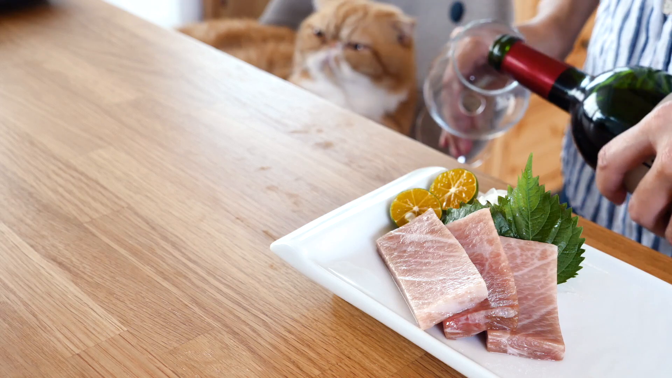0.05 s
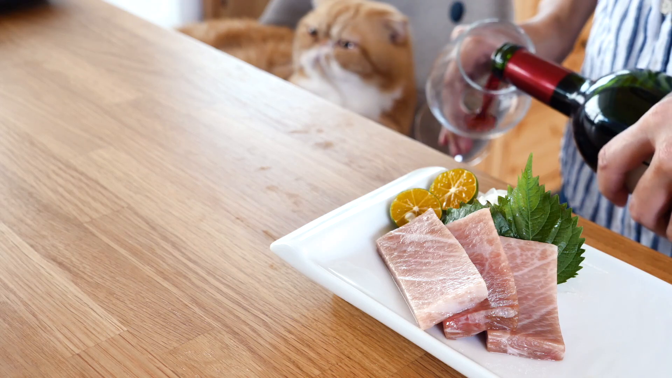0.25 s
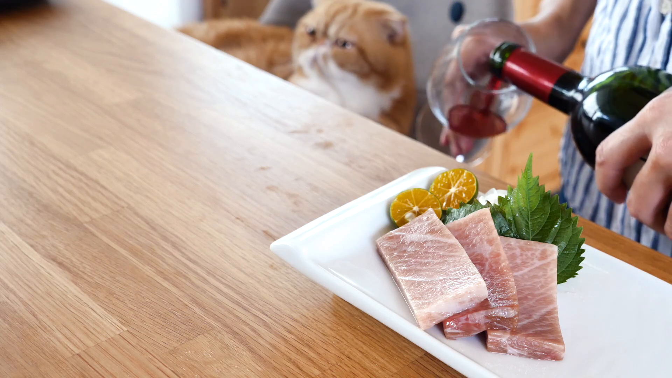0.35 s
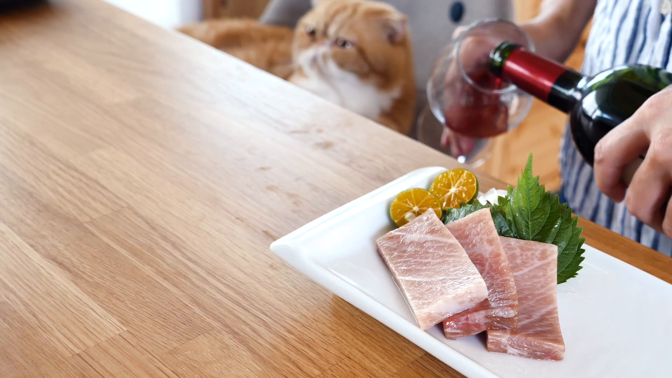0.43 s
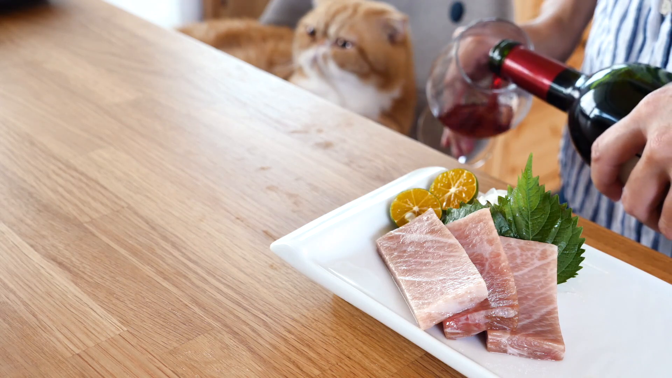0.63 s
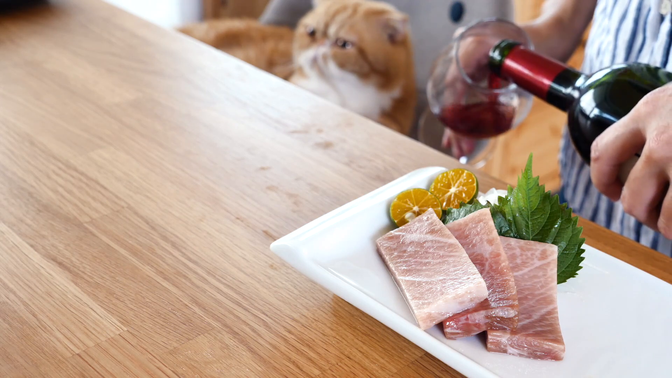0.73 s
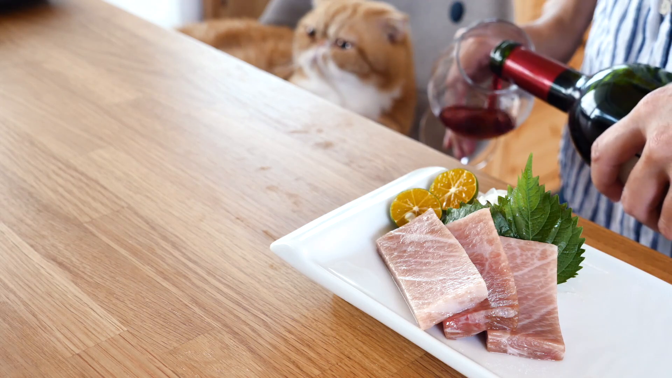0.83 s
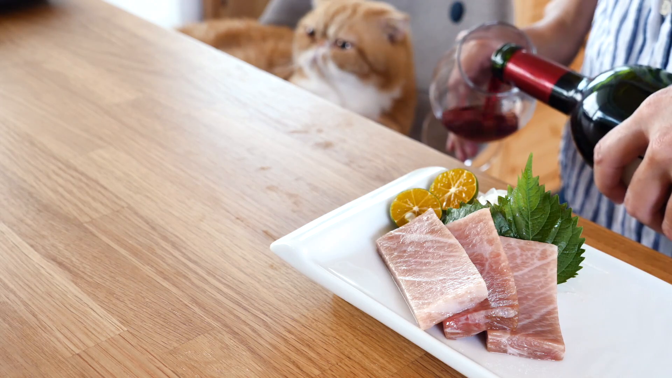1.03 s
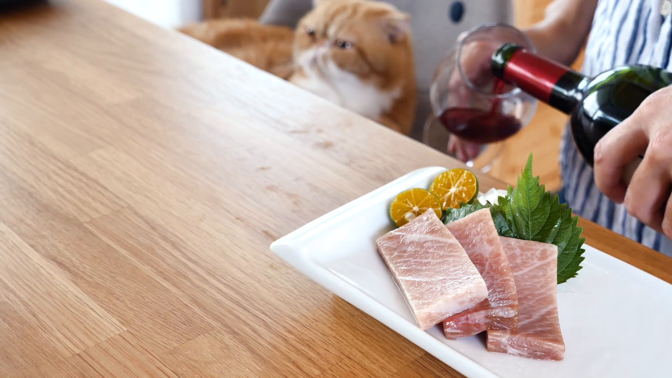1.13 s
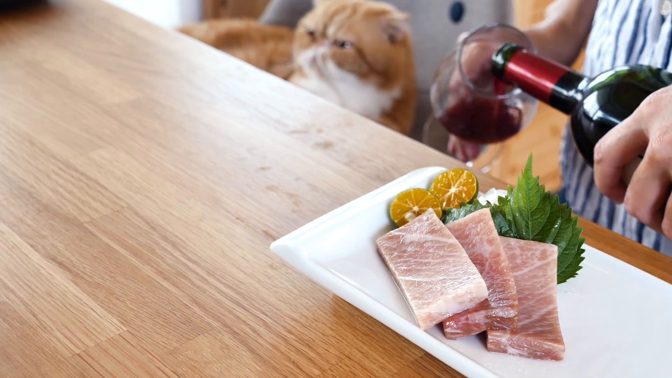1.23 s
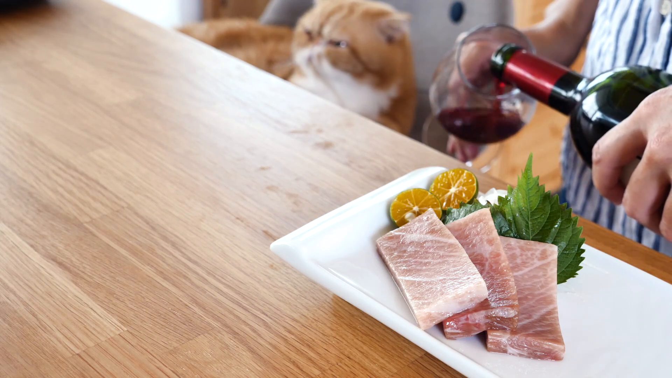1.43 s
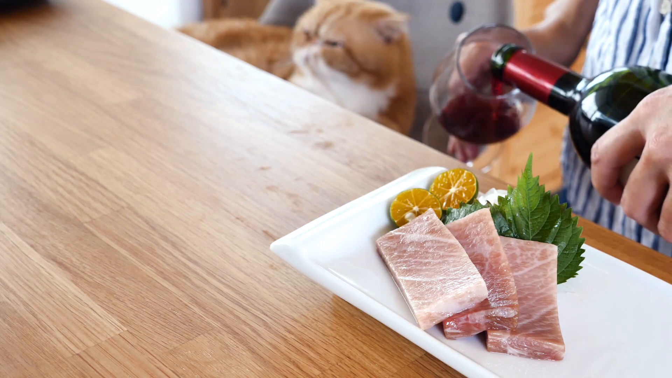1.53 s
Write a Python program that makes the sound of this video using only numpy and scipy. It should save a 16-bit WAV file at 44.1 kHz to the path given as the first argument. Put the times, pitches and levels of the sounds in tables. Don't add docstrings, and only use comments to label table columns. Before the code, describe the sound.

A full wine bottle's neck knocks the rim of a stemmed glass; the bright ring beats and fades, then a faint tick and sparse tiny bubbles follow, close to one microphone in a quiet room with ventilation hum.

```python
import sys
import numpy as np
from scipy import signal
from scipy.fft import rfft, irfft
from scipy.io import wavfile

SR = 44100
rng = np.random.default_rng(int(sys.argv[2]) if len(sys.argv) > 2 else 0)


def amplitude_ratio(level_db):
    exponent = np.asarray(level_db, float) / 20
    return 10 ** exponent


def dump_mix(stems):
    frames = np.atleast_2d(stems).T
    limited = np.clip(frames, -1, 1)
    pcm = np.round(limited * 32767).astype(np.int16)
    wavfile.write(sys.argv[1], SR, pcm)


N = 68355

CLINK_S, CONTACT_S = .2173, .0003
HIGH_LAG_S, HIGH_FROM_HZ = .0026, 5200
CRACK_DB, CRACK_T60_S = -18, .05
AFTERGLOW_DB, AFTERGLOW_T60_S = -34, .5
# frequency in Hz, level in dB, t60 in seconds.
BOWL_MODES = [(1210.9, -23.9, .48), (2619.2, -22, .34), (3255, -22, .06), (5445.5, -38, .5),
              (7376.2, -29, .12), (8279, -35, .2), (9690, -27, .08), (12812, -47, .12), (14698, -45, .1),
              (7762, -38, .08), (11015, -50, .1), (14000, -47, .07), (15250, -52, .05)]
# offset in Hz,
# share of the level (negative = opposed), t60 in seconds.
BOWL_TWINS = [(4, -.64, .64), (-11.3, -.45, .55), (-40, .03, .3), (6, .95, .5), (17, -.16, .6), (9, .3, .4),
              (-8, .12, .35), (-30, .3, .3), (29, -.1, .29), (5.2, -.1, .44), (6, .2, .3), (60, .5, .1),
              (90, .5, .1)]
# frequency in Hz, level in dB, t60 in seconds.
BOTTLE_MODES = [(559, -23, .14), (2030, -14, .02), (1825, -40, .15), (3441, -28, .17), (3500, -24, .06),
                (3820, -23, .1), (3655, -32, .1), (4772, -29, .12), (5032, -44, .2), (6080, -46, .1),
                (7194, -35, .12), (9810, -36, .08), (10450, -48, .15), (13280, -46, .08)]
# frequency in Hz, level in dB, t60 in seconds, sign.
SPLIT_CLUSTERS = [
    [(3180.6, -19.4, .85, -1), (3185.4, -20.4, .68, 1), (3189.2, -32, 1.05, -1), (3232.5, -30.8, .28, 1),
     (3170.4, -33.9, .75, -1), (3200, -31, .75, -1)],
    [(2457.8, -16.1, .21, -1), (2448.6, -28.4, .6, 1), (2472.3, -28.4, .55, 1)],
]
# frequency in Hz, level in dB per Hz.
CRACK_COLOUR = [(400, -26), (1500, -8), (2200, -2), (2850, -16), (3500, 0), (5000, -12), (6500, -32),
                (8500, -24), (15500, -38)]
# frequency in Hz, level in dB per Hz.
AFTERGLOW_COLOUR = [(1300, -14), (2100, -2), (2900, -22), (3500, 0), (5000, -8), (6300, -30), (8000, -28),
                    (15500, -42)]

TICK_S, TICK_DB, TICK_T60_S = .7522, -30, .02
TICK_TAIL_DB, TICK_TAIL_T60_S = -47, .12
# frequency in Hz, level in dB per Hz.
TICK_COLOUR = [(1800, -26), (3000, -14), (4000, -5), (5000, -9), (7000, -10), (10700, -20), (14400, -21),
               (16200, -24)]
# frequency in Hz, level in dB, t60 in seconds.
TICK_MODES = [(3990, -34, .05), (2200, -39, .02), (4538, -42, .16), (5001, -42, .08), (5663, -43, .1),
              (6697, -40, .03), (7251, -52, .1), (7612, -54, .15), (8215, -50, .05), (8839, -52, .06),
              (6115, -47, .15)]

# start in seconds, frequency in Hz, level in dB, t60 in seconds.
BUBBLES = [(.691, 1640, -34, .09), (.692, 540, -36, .07), (1.408, 5900, -53, .02), (1.449, 5850, -50, .04),
           (1.462, 12400, -63, .02), (1.462, 15600, -65, .03), (1.531, 6300, -55, .03),
           (1.342, 11500, -54, .012), (1.344, 10200, -57, .018), (1.201, 8800, -60, .02),
           (1.16, 9800, -61, .012)]
# start in seconds, level in dB, t60 in seconds.
FIZZ_PUFFS = [
    (1.192, -57, .012),
    (1.199, -61, .06),
    (1.342, -61, .04),
]
FIZZ_BAND_HZ = [8000, 15200]

ROOM_DB, ROOM_T60_S, ROOM_FROM_HZ = -10, .42, 3400

RUMBLE_DB, WHOOSH_DB, HISS_DB = -38.5, -43, -65
# frequency in Hz, level in dB per Hz.
RUMBLE_COLOUR = [(20, -47), (50, -12), (120, -8.5), (162, -.5), (244, -3), (303, -2.5), (541, -12.5),
                 (800, -15.5)]
# frequency in Hz, level in dB per Hz.
WHOOSH_COLOUR = [(470, -38), (800, -5), (987, -2.5), (1150, -2.5), (1360, -3.5), (1460, -3.5), (2880, -14),
                 (3800, -11.5), (5500, -29.5), (7150, -49), (12100, -120)]
# frequency in Hz, level in dB per Hz.
HISS_COLOUR = [(3240, -40), (5500, -2), (6500, -4.5), (8780, -10), (15000, -14.5), (15800, -11),
               (15900, -45)]
# time in seconds, level in dB.
DRAUGHT = [(0, -0.76), (.4, -0.2), (.7, -0.46), (1.1, -0.43), (1.55, -1)]

CUTOFF_HZ = 16000


def rms_one(x):
    return x / np.sqrt(np.mean(x ** 2) + 1e-20)


def coloured(spectrum):
    hz, db = np.transpose(spectrum)
    bins_hz = np.maximum(np.arange(N // 2 + 1) * SR / N, 1)
    gain = amplitude_ratio(np.interp(np.log(bins_hz), np.log(hz), db, left=-90, right=-90))
    return rms_one(irfft(gain * rfft(rng.standard_normal(N)), N))


def dying(start, t60):
    age = np.maximum(np.arange(N) / SR - start, 0)
    rise = 1 - np.exp(-age / CONTACT_S)
    return rise * amplitude_ratio(-60 * age / t60)


def ring(start, hz, db, t60, phase=0):
    age = np.arange(N) / SR - start
    return amplitude_ratio(db) * dying(start, t60) * np.sin(2 * np.pi * hz * age + phase)


def clink():
    out = coloured(CRACK_COLOUR) * amplitude_ratio(CRACK_DB) * dying(CLINK_S, CRACK_T60_S)
    out += coloured(AFTERGLOW_COLOUR) * amplitude_ratio(AFTERGLOW_DB) * dying(CLINK_S, AFTERGLOW_T60_S)

    bottle_twins = [(0, 0.035, 1)] * len(BOTTLE_MODES)
    modes = BOWL_MODES + BOTTLE_MODES
    twins = BOWL_TWINS + bottle_twins
    for (hz, db, t60), (beat_hz, share, twin_t60) in zip(modes, twins):
        start = CLINK_S + HIGH_LAG_S * (hz > HIGH_FROM_HZ)
        phase = rng.uniform(0, 2 * np.pi)
        out += ring(start, hz, db, t60, phase)
        out += share * ring(start, hz + beat_hz, db, twin_t60, phase)

    for cluster in SPLIT_CLUSTERS:
        for hz, db, t60, sign in cluster:
            out += sign * ring(CLINK_S, hz, db, t60)
    return out


def tick():
    tap = amplitude_ratio(TICK_DB) * dying(TICK_S, TICK_T60_S)
    tail = amplitude_ratio(TICK_TAIL_DB) * dying(TICK_S, TICK_TAIL_T60_S)
    modes = sum(ring(TICK_S, *mode) for mode in TICK_MODES)
    return coloured(TICK_COLOUR) * (tap + tail) + modes


def wine():
    bubbles = sum(ring(*bubble) for bubble in BUBBLES)
    band = signal.butter(2, FIZZ_BAND_HZ, "band", fs=SR, output="sos")
    froth = rms_one(signal.sosfilt(band, rng.standard_normal(N)))
    puffs = sum(amplitude_ratio(db) * dying(start, t60) for start, db, t60 in FIZZ_PUFFS)
    return bubbles + froth * puffs


def room(x):
    tail = rng.standard_normal(N) * dying(.004, ROOM_T60_S)
    tail /= np.sqrt(np.sum(tail ** 2))
    high_pass = signal.butter(4, ROOM_FROM_HZ, "high", fs=SR, output="sos")
    bright = signal.sosfilt(high_pass, x)
    return amplitude_ratio(ROOM_DB) * signal.fftconvolve(bright, tail)[:N]


def room_air():
    air = amplitude_ratio(RUMBLE_DB) * coloured(RUMBLE_COLOUR)
    air += amplitude_ratio(WHOOSH_DB) * coloured(WHOOSH_COLOUR)
    air += amplitude_ratio(HISS_DB) * coloured(HISS_COLOUR)
    times, db = np.transpose(DRAUGHT)
    return amplitude_ratio(np.interp(np.arange(N) / SR, times, db)) * air


def scene():
    glass = clink() + tick() + wine()
    return (glass + room(glass) + room_air())[None]


def roll_off(x):
    return signal.sosfilt(signal.butter(12, 16440, fs=SR, output="sos"), x)


def record(dry):
    low_pass = signal.cheby2(10, 50, CUTOFF_HZ + 800, fs=SR, output="sos")
    mix = signal.sosfilt(low_pass, dry)
    return roll_off(mix)


dry = scene()
out = record(dry)
dump_mix(out)
```